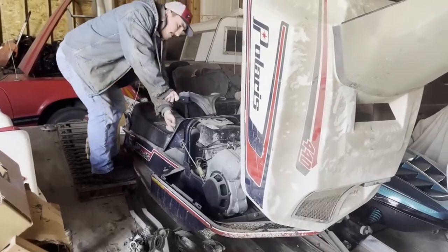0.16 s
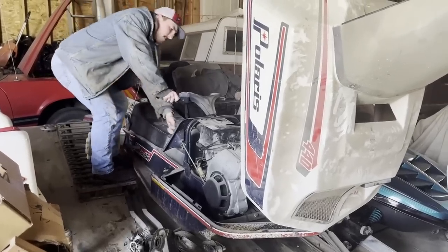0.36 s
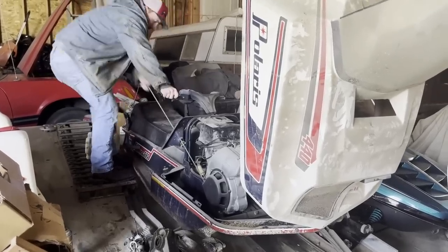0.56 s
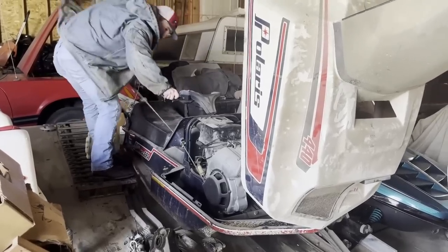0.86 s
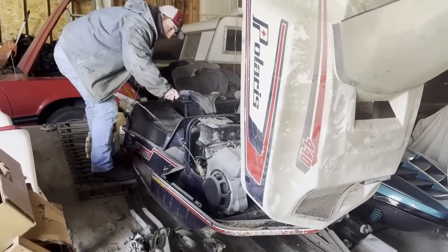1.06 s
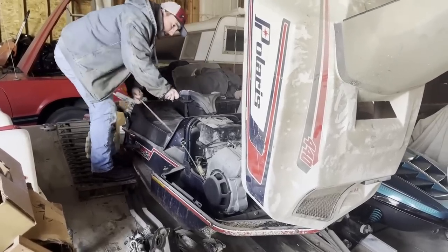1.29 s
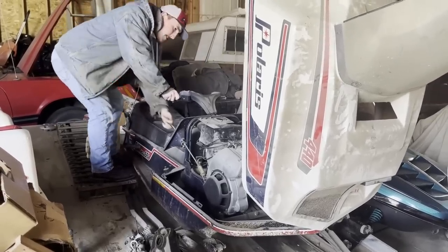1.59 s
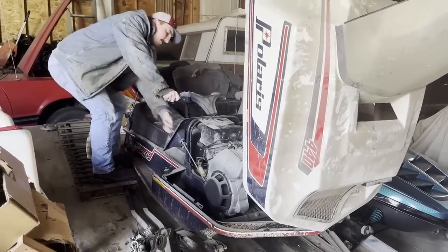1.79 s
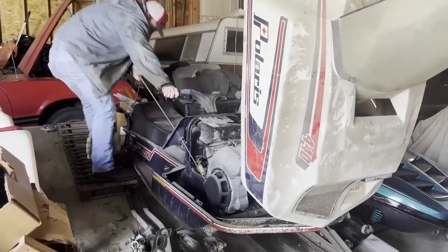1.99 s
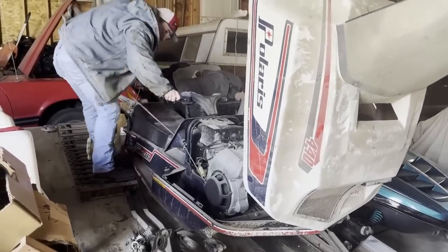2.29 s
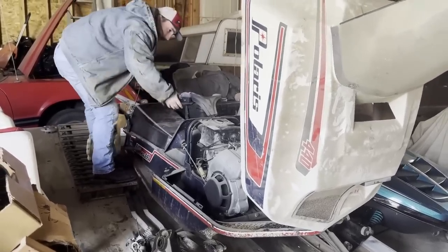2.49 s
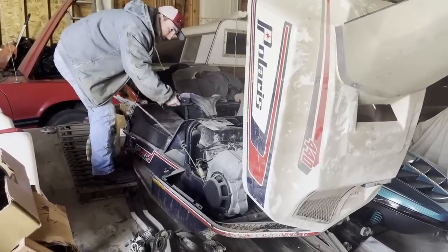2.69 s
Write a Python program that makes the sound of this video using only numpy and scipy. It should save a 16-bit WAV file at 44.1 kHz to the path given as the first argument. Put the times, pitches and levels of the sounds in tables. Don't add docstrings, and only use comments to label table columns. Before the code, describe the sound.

Close stereo microphones in a barn catch two pulls of a starter rope: sharp clack, rapid compression thumps over rattling metal and a brief pulley squeak, a bright ring, then slowing puffs and small ticks each time.

```python
import sys
import numpy as np
from scipy import signal
from scipy.fft import rfft, irfft, next_fast_len
from scipy.io import wavfile

SR = 44100
rng = np.random.default_rng(int(sys.argv[2]) if len(sys.argv) > 2 else 0)


def unload_audio(sound):
    columns = np.transpose(np.atleast_2d(sound))
    steps = np.round(np.clip(columns, -1, 1) * 32767)
    wavfile.write(sys.argv[1], SR, steps.astype(np.int16))


def volts_from_db(level):
    exponent = np.asarray(level, float) / 20
    return 10 ** exponent


N = 125685

# time in seconds, peak in dB.
CHIRPS_PULL_1 = [(0.2653, -31), (0.306, -22.5), (0.387, -23), (0.4361, -17), (0.4755, -18), (0.5183, -13.5),
                 (0.5583, -14), (0.603, -16.5), (0.6438, -14.5), (0.6981, -15.5), (0.7566, -25),
                 (0.8273, -26.5), (0.9215, -32.5), (1.007, -40)]
# time in seconds, peak in dB.
CHIRPS_PULL_2 = [(1.73, -24), (1.7846, -24.5), (1.8297, -18), (1.8669, -23), (1.9058, -16), (1.944, -20.5),
                 (1.9878, -20.5), (2.0192, -21), (2.0748, -22.5), (2.1221, -22.5), (2.1814, -21),
                 (2.2456, -26), (2.298, -43), (2.3313, -24), (2.4033, -37.5)]
# frequency in Hz, level in dB per Hz.
RATTLE_COLOUR = [(140, -14.5), (300, -3), (520, -10.5), (1330, -9), (6540, -35), (8190, -37.5),
                 (10600, -35.5), (15000, -45.5)]
# frequency in Hz, level in dB per Hz.
CRACK_COLOUR = [(240, -46), (400, 1), (5110, -8.5), (7130, -12.5), (8430, -15.5), (10600, -14),
                (15000, -22.5)]


def rms_one(x):
    return x / np.sqrt(np.mean(x ** 2) + 1e-20)


def at_hz(points, hz):
    p = np.array(points, float)
    return np.interp(np.log(np.maximum(hz, 1)), np.log(np.maximum(p[:, 0], 1)), p[:, 1])


def colour(x, spectrum):
    log_gain = at_hz(spectrum, np.linspace(0, SR / 2, 1025)) * np.log(10) / 20
    cepstrum = irfft(log_gain)
    cepstrum[1:1024] *= 2
    cepstrum[1025:] = 0
    return signal.fftconvolve(x, irfft(np.exp(rfft(cepstrum))))[:N]


def coloured_noise(spectrum):
    return colour(rng.standard_normal(N), spectrum)


def drift(rate_hz):
    r = np.exp(-2 * np.pi * rate_hz / SR)
    slow = signal.lfilter([1], [1, -2 * r, r * r], rng.standard_normal(N + SR))
    return rms_one(slow[SR:])


def low(x, hz):
    r = np.exp(-2 * np.pi * hz / SR)
    return signal.lfilter([1 - r], [1, -r], x)


def butter(x, order, hz, kind):
    return signal.sosfilt(signal.butter(order, hz, kind, fs=SR, output="sos"), x)


def ring(x, hz, t60):
    r, w = volts_from_db(-60 / (t60 * SR)), 2 * np.pi * hz / SR
    return signal.lfilter([0, np.sin(w)], [1, -2 * r * np.cos(w), r * r], x + 1e-18)


def clicks(s, gains):
    out = np.zeros(N)
    np.add.at(out, (np.asarray(s) * SR).astype(int), gains)
    return out


def strike(rows, modes, spread_db):
    s, db = np.array(rows)[:, :2].T
    luck = spread_db * rng.standard_normal((len(s), len(modes)))
    out = np.zeros(N)
    for k, (hz, mode_db, t60) in enumerate(modes):
        out += ring(clicks(s, volts_from_db(db + mode_db + luck[:, k])), hz, t60)
    return out


def burst(s, db, t60):
    return signal.lfilter([1], [1, -volts_from_db(-60 / (t60 * SR))], clicks(s, volts_from_db(db)) + 1e-18)


def exhaust():
    # time in seconds, strength in dB.
    thumps_1 = [(.275, -18), (.356, -5), (0.416, -7.5), (0.456, -4), (.498, -3.5), (0.541, -4.5),
                (0.585, -4), (.633, -1), (0.668, -10.5), (0.729, -8.5), (.785, -10), (0.861, -13.5),
                (0.898, -19), (0.981, -18.5), (1.031, -18), (1.100, -44.5), (1.150, -24.5), (1.223, -28)]
    # time in seconds, strength in dB.
    thumps_2 = [(1.685, -23), (1.754, -7.5), (1.811, -5), (1.845, -11.5), (1.884, 0.5), (1.924, -5),
                (1.959, -5), (2.011, -12.5), (2.052, -12.5), (2.088, -21), (2.154, -9), (2.212, -12.5),
                (2.292, -12.5), (2.338, -12), (2.401, -19), (2.499, -19.5), (2.572, -26), (2.637, -29.5),
                (2.709, -33)]
    # frequency in Hz, level in dB, t60 in seconds.
    modes = [(60.5, -16.5, 0.18), (104.3, -3.5, 0.27), (115.3, 6, 0.38), (177.9, 0.5, 0.086),
             (202.1, -11.5, 0.65), (273.5, -2, 0.11), (336.2, -3.5, 0.17), (366.3, -10.5, 0.47),
             (791.7, -15.5, 0.5)]
    luck_db, thump_cut_hz, choke_db = 1.5, 630, -8.5
    thumps = [*thumps_1, *thumps_2]
    s, db = np.transpose(thumps)

    flow = rng.standard_normal(N)
    gusts = low(burst(s, db - 14, 0.46), 20.6)
    drone = [volts_from_db(mode_db) * rms_one(ring(flow, hz, 0.57 * t60)) for hz, mode_db, t60 in modes]

    strokes = [*CHIRPS_PULL_1[2:], *CHIRPS_PULL_2[1:]]
    push = volts_from_db(13) * low(strike(strokes, modes[:3], luck_db), 150)
    deep_thump = low(strike(thumps, modes[:3], luck_db) + push, 235)
    deep = gusts * sum(drone[:3]) - volts_from_db(-9.5) * deep_thump
    swing = low(np.abs(signal.hilbert(deep)), 73)
    deep /= np.sqrt(1 + (swing / volts_from_db(choke_db)) ** 2)

    upper_thump = low(low(strike(thumps, modes[3:], luck_db), thump_cut_hz), thump_cut_hz)
    upper = volts_from_db(-5.5) * gusts * sum(drone[3:]) - volts_from_db(-6) * upper_thump
    puff = rms_one(coloured_noise(RATTLE_COLOUR)) * low(burst(s, db - 19, 0.086), 56)
    return deep + upper + puff


def intake():
    # frequency in Hz, level in dB, t60 in seconds.
    modes = [(1199.4, -3, 0.06), (1268, -1.5, 0.037), (1139, -15, 0.022)]
    swell_s, whistle_lead_s, chuff_lead_s = 0.01185, 0.00392, 0.0094
    s, db = np.transpose([*CHIRPS_PULL_1, *CHIRPS_PULL_2])

    size = int(swell_s * SR) + 2
    swell = np.hanning(size) * np.cos(2 * np.pi * modes[0][0] * np.arange(size) / SR)
    rung = strike(np.transpose([s - whistle_lead_s, db]), modes, spread_db=1.5)
    whistle = np.convolve(rung, swell / (0.12 * size))[size // 3:N + size // 3] * volts_from_db(3)
    whistle *= volts_from_db(1.5 * drift(150))

    wind = rms_one(butter(rng.standard_normal(N), 2, [900, 3320], "band"))
    chuff = wind * low(burst(s - chuff_lead_s, db - 12.5, 0.084), 200)
    return whistle + chuff


def catches():
    # time in seconds, peak in dB, low edge in Hz, high edge in Hz, burst t60 in seconds.
    contacts = [(0.1439, -31.5, 503, 2440, 0.19), (0.189, -15, 3170, 14200, 0.15),
                (0.205, -13.5, 1430, 9100, 0.1), (0.211, -17, 510, 14000, 0.08),
                (0.2155, 0, 252, 13900, 0.06), (0.2209, -13, 251, 3010, 0.03),
                (1.5600, -29.5, 520, 2420, 0.24), (1.5997, -14.5, 2700, 13200, 0.057),
                (1.605, -13.5, 1630, 1980, 0.092), (1.618, -13, 2480, 14000, 0.31),
                (1.625, -2.5, 2000, 14000, 0.045), (1.6262, -9.5, 410, 7300, 0.06),
                (1.626, -17.5, 197, 5000, 0.081), (1.6420, -17, 200, 1990, 0.062)]
    # frequency in Hz, level in dB, t60 in seconds.
    housing = [(662, 3, .18), (1055, 0, .12), (1290, 2, .1), (1800, 1, .08), (2433, 1, .04),
               (3230, 2, .035), (3380, 0, .03), (4520, -1, .03), (5330, -4, .025), (6460, -2, .025)]
    out = np.zeros(N)
    noise = rms_one(coloured_noise(CRACK_COLOUR))
    for s, db, low_hz, high_hz, t60 in contacts:
        crack = noise * low(burst([s], db - 3, t60), 290)
        hit = volts_from_db(-14) * strike([(s, db)], housing, spread_db=0) + crack
        out += butter(hit, 2, [low_hz, high_hz], "band")
    return out


def bright_crack():
    return rms_one(signal.lfilter([1, -.8], [1], coloured_noise(CRACK_COLOUR)))


def releases():
    # time in seconds, peak in dB.
    let_go = [
        (0.6111, -12.5),
        (1.9965, -14),
    ]
    # frequency in Hz, first pull in dB, second pull in dB, t60 in seconds.
    cup = [(1798, -14, -16, .16), (3289, -8, -8, .05), (3570, -20, -4, .55), (3640, -24, -9, .45),
           (4025, -9, -14, .45), (4083, -12, -18, .4), (5610, -15, -7, .45), (5674, -10, -11, .45),
           (10270, -18, -18, .2), (10790, -13, -11, .12)]
    out = np.zeros(N)
    noise = bright_crack()
    for k, (s, db) in enumerate(let_go):
        modes = [(m[0], m[1 + k], m[3]) for m in cup]
        out += volts_from_db(-3.5) * strike([(s, db)], modes, spread_db=0) * volts_from_db(1.5 * drift(60))
        first, second = burst([s], db + 0.5, 0.054), burst([s + 0.0098], db - 7, 0.089)
        tail = burst([s], db, 0.22)
        out += noise * low(first + second + tail, 500)
    return out


def effort_db():
    # time in seconds, level in dB.
    effort = [(0.203, -125), (0.221, -22), (.30, -36), (.60, -29.5), (.86, -46), (1.10, -50.5),
              (1.40, -56.5), (1.55, -76), (1.617, -99), (1.635, -27), (1.718, -36), (1.999, -29.5),
              (2.139, -42), (2.40, -48.5), (2.85, -59.5)]
    s, db = np.transpose(effort)
    return np.interp(np.arange(N) / SR, s, db)


def rattle():
    # frequency in Hz, level in dB, t60 in seconds.
    modes = [(775, -6, .03), (2460, -8, .04), (2940, -9, .025), (3490, -12, .025), (3930, -15, .025),
             (4510, -15, .04), (5350, -18, .04), (6070, -22, .03)]
    knocks_per_s = 900
    sizes = volts_from_db(3.5 * np.minimum(rng.exponential(1, N), 4)) * rng.choice([-1, 1], N)
    knocks = sizes * (rng.random(N) < knocks_per_s / SR)
    struck = rng.integers(0, len(modes), N)
    cases = np.zeros(N)
    for k, (hz, db, t60) in enumerate(modes):
        cases += volts_from_db(db) * ring(knocks * (struck == k), hz, t60)
    hiss = rms_one(colour(0.66 * rms_one(knocks) + rng.standard_normal(N), RATTLE_COLOUR))
    flutter_db = 1.8 * drift(22)
    return (hiss + volts_from_db(-9) * rms_one(cases)) * volts_from_db(effort_db() + 9.5 + flutter_db)


def pings():
    # time in seconds, peak in dB, frequency in Hz, t60 in seconds.
    parts = [(.190, -17, 3171, .054), (.191, -21, 5335, .035), (.191, -19, 6444, .04),
             (.2035, -20, 1782, .06), (.2075, -22, 5620, .05), (.211, -13, 1287, .1), (.214, -10, 668, .07),
             (.2145, -20, 3182, .05), (.217, -18, 4517, .05), (.229, -17, 1300, .05),
             (.356, -27, 2330, .05), (.430, -28, 4510, .08), (.430, -25, 2470, .06),
             (.5486, -25, 4510, .09), (.5486, -28, 5350, .07), (.572, -29, 4510, .07),
             (.615, -13, 3170, .04), (.6165, -17, 1800, .12), (.626, -13, 3250, .05),
             (1.042, -38, 2420, .06), (1.046, -40, 3300, .1), (1.39, -38, 650, .1),
             (1.5985, -22, 6900, .04), (1.5985, -22, 4900, .04), (1.6, -21, 3200, .05),
             (1.602, -25, 5330, .05), (1.62, -20, 3400, .04), (1.624, -18, 4100, .04),
             (1.6275, -12, 662, .1), (1.6275, -16, 2433, .08), (1.642, -18, 1314, .08),
             (1.642, -24, 4479, .06), (1.861, -25, 2440, .07), (1.9536, -24, 2960, .05),
             (1.956, -26, 4510, .08), (1.999, -15, 3400, .03), (2.006, -19, 1800, .1),
             (2.01, -19, 2800, .03), (2.1776, -30, 3640, .08), (2.4804, -43, 3340, .08)]
    rung = sum(ring(clicks([s], volts_from_db(db)), hz, t60) for s, db, hz, t60 in parts)
    return butter(rung, 2, 400, "high")


def ticks():
    # time in seconds, peak in dB.
    touches = [(0.3651, -53), (0.412, -10), (0.4785, -17), (0.509, -30), (0.5482, -23), (0.8965, -20.5),
               (1.0444, -36), (1.128, -26.5), (1.141, -20.5), (1.2116, -27.5), (1.382, -32), (1.788, -17),
               (1.9355, -57.5), (1.953, -21), (2.2494, -28), (2.4841, -32), (2.6456, -37.5), (2.668, -28),
               (2.717, -38)]
    s, db = np.transpose(touches)
    tick, tail = burst(s, db - 18, .04), burst(s, db - 22.5, 0.33)
    return bright_crack() * low(tick + tail, 150)


def squeaks():
    # start in seconds, length in seconds, frequency in Hz, level in dB.
    rubs = [
        (0.345, 0.135, 1933, -26),
        (1.70, 0.06, 1933, -28),
        (1.745, 0.04, 1933, -20),
        (0.27, 0.07, 1320, -29),
        (.27, 0.07, 450, -27),
        (1.605, .02, 1800, -16),
    ]
    t, out = np.arange(N) / SR, np.zeros(N)
    for s, length, hz, db in rubs:
        shape = np.clip(np.minimum(t - s, s + length - t) / .02, 0, 1)
        waver = rms_one(ring(rng.standard_normal(N), hz, 0.083))
        out += volts_from_db(db) * shape * (np.sin(2 * np.pi * hz * t) + .5 * waver)
    return out


def barn(x):
    t60_s, wall_cut_hz = 1, 3200
    t = np.arange(SR) / SR
    echoes = rng.standard_normal((2, SR)) * (t > .008)
    dull = low(echoes, wall_cut_hz / 4) * volts_from_db(-60 * t / t60_s)
    bright = low(echoes, wall_cut_hz) * volts_from_db(-60 * t / (0.46 * t60_s))
    tail = dull + bright
    tail /= np.sqrt(np.sum(tail ** 2, axis=1, keepdims=True))
    return signal.fftconvolve(x[None], tail, axes=1)[:, :N]


def still_air():
    # frequency in Hz, level in dB per Hz.
    spectrum = [(24, -42.5), (40, -6.5), (370, -13.5), (535, -37.5), (583, -22.5), (7000, -44), (9100, -71),
                (15400, -120)]
    noise = rng.standard_normal(N) + 0.1 * rng.standard_normal((2, N))
    return np.array([volts_from_db(-48) * rms_one(colour(channel, spectrum)) for channel in noise])


def scene():
    pipe = exhaust()
    metal = intake() + catches() + releases() + rattle() + pings() + ticks() + squeaks()
    return pipe + metal + volts_from_db(-13) * barn(metal + .15 * pipe) + still_air()


def limiter(x):
    limit_db, ratio, release_db_per_s = -5, .7, 80
    ramp = release_db_per_s * np.arange(N) / SR
    peak_db = 20 * np.log10(np.abs(x).max(axis=0) + 1e-9)
    level = np.maximum.accumulate(peak_db + ramp) - ramp
    return x * volts_from_db(low(-ratio * np.maximum(level - limit_db, 0), 37))


def low_pass(x):
    return signal.sosfilt(signal.butter(12, 15770, fs=SR, output="sos"), x)


def record(dry):
    # frequency in Hz, difference in dB.
    width = [(60, -26), (160, -19), (380, -12), (950, -8), (2400, -7), (5000, -3), (9000, -.5), (14000, .7)]
    size = next_fast_len(N + 4096)
    hz = np.arange(size // 2 + 1) * SR / size
    turn = np.exp(1j * np.arctan(volts_from_db(at_hz(width, hz))) * np.array([[1], [-1]]))
    notch_db = -28 * np.exp(-((hz - 8450) / 700) ** 4)
    shelf_db = -19 / (1 + np.exp((14500 - hz) / 60))
    x = irfft(rfft(limiter(dry), size) * turn * volts_from_db(notch_db + shelf_db), size)[:, :N]
    x = butter(x, 3, 58.5, "high")
    x = butter(x, 10, 15400, "low")
    x = .95 * np.tanh(x / .95)
    return low_pass(x)


dry = scene()
out = record(dry)
unload_audio(out)
```